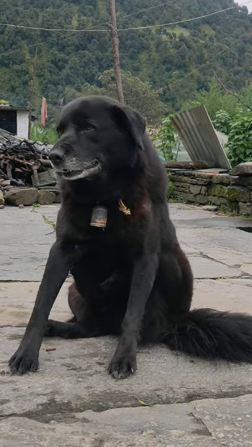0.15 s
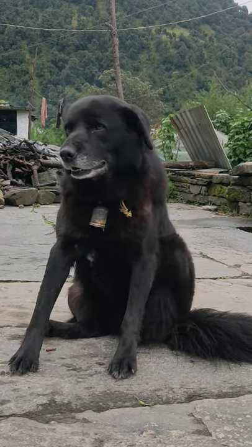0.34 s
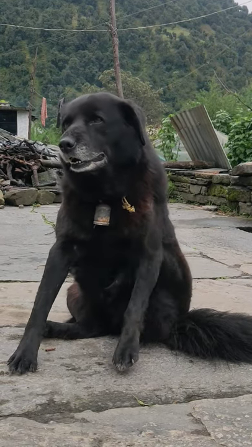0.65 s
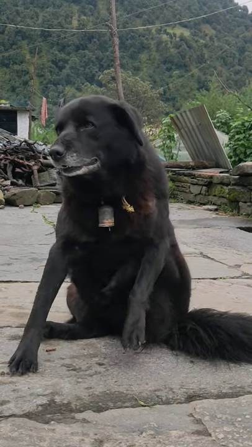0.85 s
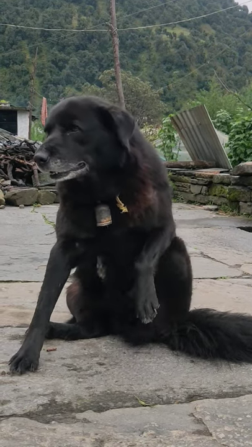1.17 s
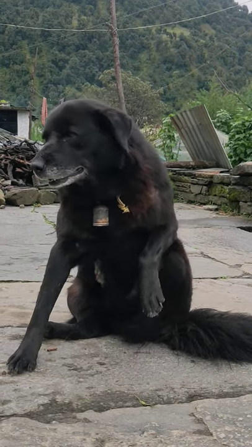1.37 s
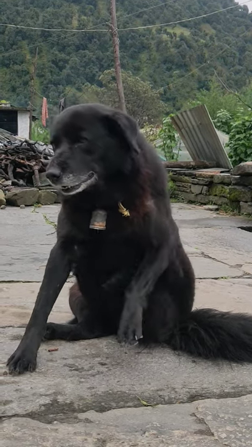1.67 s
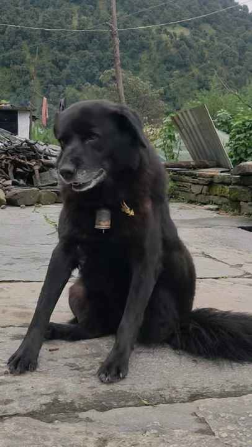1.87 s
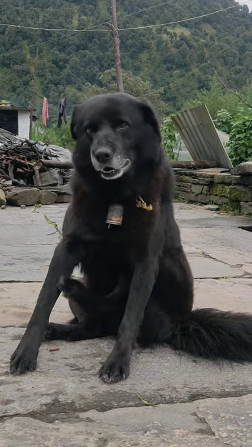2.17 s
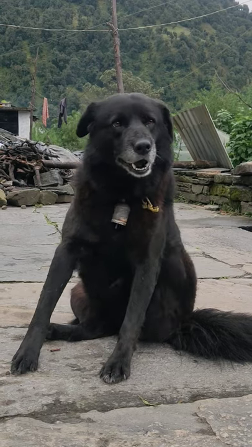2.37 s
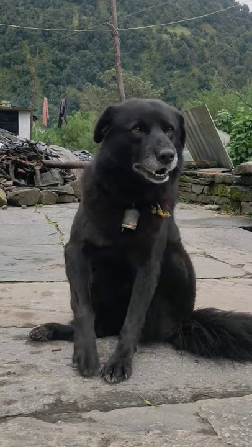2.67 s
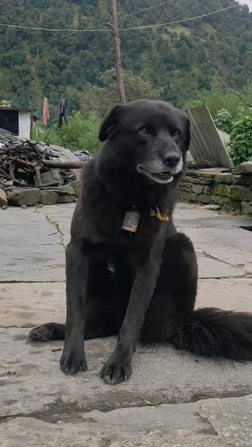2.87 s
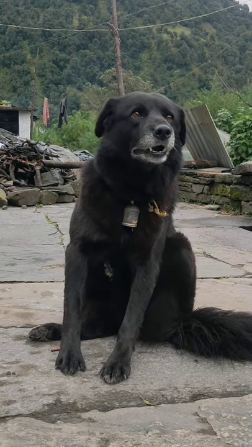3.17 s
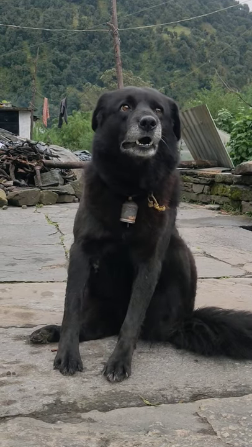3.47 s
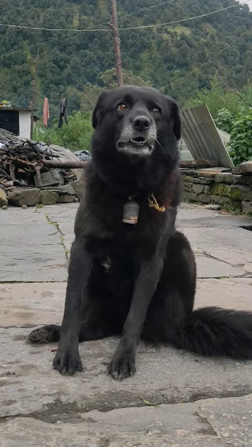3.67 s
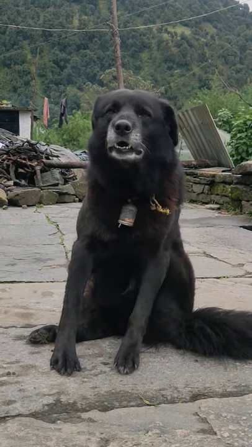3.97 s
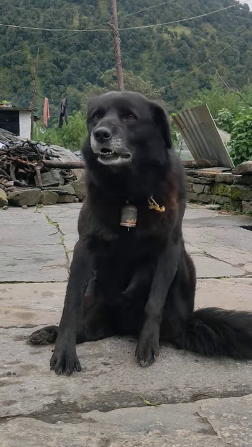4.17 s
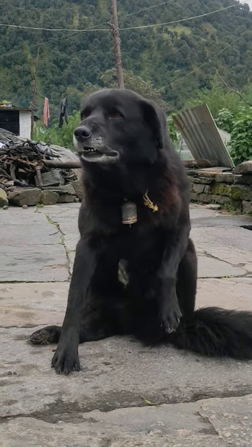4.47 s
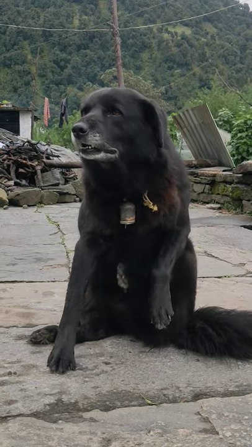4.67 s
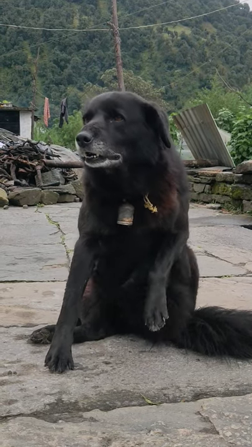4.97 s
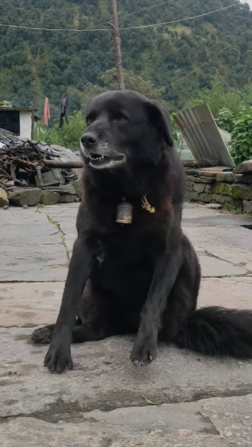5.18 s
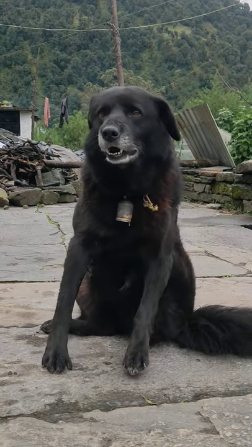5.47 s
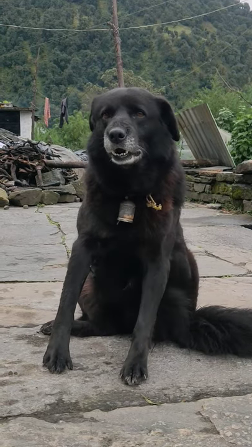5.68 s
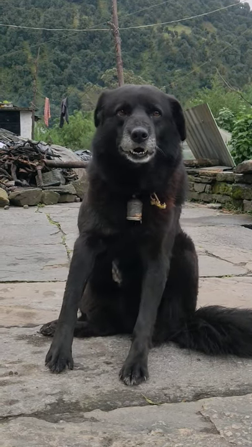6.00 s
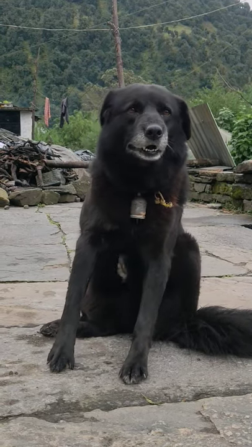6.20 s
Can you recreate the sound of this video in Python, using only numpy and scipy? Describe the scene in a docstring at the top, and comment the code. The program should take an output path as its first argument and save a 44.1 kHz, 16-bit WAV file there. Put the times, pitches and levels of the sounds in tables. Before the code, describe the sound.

A small metal bell on a dog's collar clanks and rings close to the microphone, in quick, uneven strokes with a few brief pauses, as the dog scratches and shifts. The dog pants softly throughout. Further off in the stone courtyard, a bird gives two runs of quick chirps, then another whistles and trills near the end. A quiet hush of wind and distant water lies underneath.

```python
"""A small collar bell jingles as a panting dog scratches itself in a stone courtyard.
The clapper knocks about nine times a second: each blow gives a short clank and sets the metal ringing.
The low tones come in pairs, and the spot hit on the rim decides which twin of a pair rings more.
The panting is air rushing through throat and mouth. Three birds sing gliding tones around the yard,
over a quiet hush of wind and distant water and one brief, faint hiss of insects."""
import sys
import numpy as np
from scipy import signal
from scipy.fft import rfft, irfft
from scipy.io import wavfile

SR = 44100
rng = np.random.default_rng(int(sys.argv[2]) if len(sys.argv) > 2 else 0)


def master(y):
    """Save y as 16-bit WAV."""
    cut = np.clip(np.atleast_2d(y).T, -1, 1)
    pcm = np.round(cut * 32767)  # scale
    wavfile.write(sys.argv[1], SR, pcm.astype(np.int16))


N = 279594

# Tone colour of the hush: f/Hz, relative level/dB
HUSH_COLOUR = [(70, -24), (120, -12.5), (220, -6), (450, -9.5), (800, -7), (1300, -10), (2000, -14),
               (3500, -22), (4800, -36), (7500, -47), (15700, -40), (16100, -75)]
# Loudness of the hush: t/s, level/dB
HUSH_LEVEL = [(0, -53), (3, -55.5), (6.34, -58)]
# Far bird's notes: start t/s, end t/s, start f/Hz, end f/Hz, level/dB
FAR_SLIDES = [(0.043, 0.122, 6900, 6100, -73), (.235, 0.29, 5260, 5700, -76),
              (0.283, 0.35, 5100, 4730, -75), (0.308, 0.342, 6470, 6340, -71),
              (3.354, 3.427, 5830, 7300, -71.5), (3.48, 3.556, 7200, 6040, -76),
              (3.608, 3.656, 6000, 5870, -71), (3.724, 3.793, 5740, 7230, -70),
              (3.823, 3.92, 5450, 5140, -73), (3.947, 4.01, 6940, 5760, -71), (4.21, 4.25, 6370, 6750, -74),
              (4.48, 4.57, 5660, 6440, -74)]
# Whistling bird, one list per note: t/s, f/Hz, level/dB, trill depth/0-1
WHISTLES = [
    [(4.705, 2860, -62, 0.4), (4.72, 2960, -58, 0.4), (4.735, 3130, -52, 0.6), (4.745, 3050, -70, .3)],
    [(4.755, 2800, -73, 0), (4.85, 3130, -49, 0), (4.9, 3360, -50, 0.5), (4.93, 3456, -50, 0.6),
     (4.96, 3470, -60, .9), (5.1, 3550, -51, 0.5), (5.345, 3520, -56, 0.64), (5.355, 3450, -76, .9)],
    [(5.415, 3120, -59, 0.5), (5.44, 3420, -59, 0.7), (5.47, 3040, -52, 0.4), (5.478, 3020, -76, 0.2)],
    [(5.482, 3000, -79, 0), (5.5, 3080, -56, 0), (5.525, 3125, -40.5, 0.04), (5.545, 2930, -67, 0),
     (5.562, 2830, -57, 0.1), (5.57, 2770, -68, 0)],
]
# Chirping bird's calls: t/s, level/dB
CHIRPS = [(.80, -66), (.879, -60.5), (.96, -59), (1.038, -59), (1.125, -61), (1.205, -59), (1.295, -58.5),
          (1.39, -60.5), (3.10, -61.5), (3.171, -60), (3.248, -65), (3.325, -62), (3.408, -62.5),
          (3.494, -61), (3.58, -61), (3.67, -61), (3.762, -59.5)]
# The arch of one chirp: t/s, f/Hz, added level/dB
CHIRP_SHAPE = [(0, 3483, -10), (.005, 3462, 15), (.014, 3702, 12), (0.019, 4016, 8), (.032, 3625, 12.5),
               (.038, 3200, -28)]
# Notes that open or close a run of chirps: t/s, length/s, start f/Hz, top f/Hz, end f/Hz, level/dB
SINGLE_NOTES = [(0.746, 0.029, 4370, 4600, 3390, -46.5), (3.03, 0.039, 4400, 4580, 3390, -51),
                (3.863, 0.033, 3940, 4300, 3900, -52)]

# Breaths, out and in by turns: middle t/s, throat level/dB
PANTS = [(.126, -44.5), (.338, -50), (0.511, -46.5), (.738, -50.5), (0.864, -51.5), (1.054, -49),
         (1.211, -45.5), (1.425, -53.5), (1.568, -50.5), (1.75, -50), (1.883, -47.5), (2.092, -59),
         (2.285, -49.5), (2.48, -50.5), (2.614, -44.5), (2.817, -51), (2.942, -52), (3.284, -51),
         (3.432, -49), (3.591, -49), (3.736, -48.5), (3.954, -52), (4.112, -50.5), (4.26, -58),
         (4.357, -55.5), (4.58, -57.5), (4.741, -55.5), (4.92, -61.5), (5.15, -60), (5.25, -56.5),
         (5.382, -56.5), (5.604, -56), (5.795, -55), (5.95, -57), (6.084, -50)]
# A breath out, then a breath in: length/s, mouth level against the throat/dB
BREATH_KINDS = [(.08, -9), (.105, -13.5)]
# Pitches that the open mouth boosts: f/Hz, width/Hz, relative level/dB
MOUTH_BANDS = [(525.5, 55, 1.5), (1227, 230, 8.5), (2455, 350, -5)]

# Clapper blows; the first row is a ring already under way: t/s, clank level/dB, level/dB of each of
# the three low pairs, treble level/dB, treble tilt/dB per octave, spot on the rim/degrees
BLOWS = [(0.0, -61.5, -25, -43.5, -88, -98, 0, 94), (0.0251, -29.5, -24, -37.5, -52, -55, -26, 101.7),
         (0.139, -35.5, -19.5, -41.5, -60.5, -56.5, 12, 93.0),
         (0.4969, -38, -26, -39.5, -62.6, -56.5, 5, 157), (0.575, -26, -11, -37.5, -52.5, -45, 7, 92.0),
         (0.6562, -32.5, -19, -38.5, -75, -63.1, 14, 155), (0.8131, -28.5, -17, -39, -63, -61, 18, 103),
         (0.929, -41, -24.5, -58.3, -62.5, -60.5, -5.0, 175.5),
         (1.122, -32, -23, -38.5, -69, -59, -3.0, 39.0), (1.2323, -25, -17.5, -42.5, -57, -52, 20.0, 106.2),
         (1.3372, -24.5, -21, -45.2, -40, -51.7, -13, 139),
         (1.4503, -26.5, -17.5, -39.5, -65, -53, 17, 109.2),
         (1.5492, -34, -19, -40.5, -45, -48.5, -27, 99.4), (1.6547, -26, -17.5, -40.5, -60.2, -63, -3, 95),
         (1.7825, -36.5, -23, -42.5, -56.5, -62.5, -3, 90.5),
         (2.1929, -34.5, -32.5, -43.5, -48.5, -55.5, -43, 100),
         (2.3239, -30.5, -20, -38.1, -61, -51, 0, 46), (2.4321, -28.5, -20.5, -38.5, -57, -51.5, -3, 33.6),
         (2.5806, -30.5, -25.5, -37, -61, -47, -2, 3.4), (2.6675, -29.5, -20, -37, -58, -47.5, -18, 41),
         (2.8608, -35, -25, -40, -77.2, -54, -11, 69.5), (2.9352, -26, -20, -37.5, -82, -51, 4, 56),
         (3.1082, -41, -25.5, -42, -71, -52.5, 3.0, 8.1), (3.2211, -30.5, -20.1, -45.5, -68, -52, 1, 24.6),
         (3.4404, -34, -25.5, -40, -57.5, -52, 0, 1.1), (3.545, -28.5, -21, -38.5, -60.5, -53, -3, 33.7),
         (3.6916, -32, -21, -39, -61, -52, 6, 84.4), (3.81, -35.5, -23, -38.6, -55.5, -58.5, 6.0, 73.5),
         (3.9275, -27.5, -21, -39.5, -56, -51, 9, 77), (4.0167, -29, -20, -38, -59, -53.5, 5, 27.6),
         (4.145, -29.5, -17.5, -40.5, -72, -55, -9, 162.7), (4.2586, -33, -25, -42.5, -50, -60.5, 8, 161.5),
         (4.3666, -28, -21, -37.6, -62, -51, 2, 132), (4.4785, -31.5, -27.5, -49, -53, -54.5, -13, 140),
         (4.5752, -28, -21, -40, -71, -52, 2.0, 155.4), (4.6842, -32.5, -22.5, -38, -47.5, -57, -7, 144),
         (4.7847, -22.5, -20, -40, -65, -46, 20, 117), (4.8896, -27.5, -23, -44, -49.5, -50, -13, 117.0),
         (4.9829, -28.5, -19, -39.5, -54, -53.6, 14, 97.4),
         (5.11, -33.5, -29.5, -41.5, -52.4, -60.5, -19, 151.4),
         (5.209, -31.5, -23, -41.5, -61.3, -54, -1, 92.0), (5.3254, -34.5, -32, -48.6, -62.5, -65, -23, 93),
         (5.6578, -41, -32, -47.5, -78.5, -63, 0, 142), (5.817, -45, -32, -47, -84, -65, -8, 39.0),
         (5.9429, -28, -22.5, -40.5, -57, -54, 9, 32.6), (6.091, -36, -23, -38.5, -66.6, -54.5, -4, 73.6),
         (6.167, -27, -20.5, -36, -62.0, -54, -2.0, 138), (6.3123, -32.5, -24, -40, -55.5, -48.5, 16, 77.6)]
# Faint ticks of collar and claws: t/s, level/dB
TICKS = [(.079, -48), (.322, -50), (1.001, -43), (1.028, -51), (1.504, -41), (2.541, -50), (2.996, -46),
         (4.748, -43)]
# Short-lived tones of a clank: f/Hz, relative level/dB, fade time/s (the time to drop by 60 dB)
CLANK_TONES = [(1240, -6, 0.013), (2370, -5.5, 0.012), (2923, -16.5, 0.032), (5780, -20, 0.024)]
# The bell's six low tones, pair by pair: f/Hz
LOW_HZ = [1416, 1522, 3876, 4409, 7380, 7585]
# The same tones: relative level when hit on their best spot/dB, basic fade time/s
LOW_TONES = [(-16, 0.64), (1.5, 0.34), (1.5, 0.54), (-2.5, .45), (-2, 0.24), (1.5, 0.27)]
# How each pair bends the rim: number of waves around it
RIM_WAVES = [2, 3, 4]
# Where each pair's wave pattern starts: angle/degrees
RIM_START_DEG = [0, 63.5, 151]
# The bell's treble tones: f/Hz
TREBLE_HZ = [9233, 9736, 9927, 10466, 11185, 11547, 12326, 12565, 12803, 12986, 13783, 14050, 14595, 14845,
             15320]
# Their usual shares of the treble: relative level/dB
TREBLE_SHARES = [-12.5, -10.5, -22, -5, -1.5, -6, -17.5, -3.5, -7, 0.5, -13, -9.5, -3.5, -19, -16]
# How hard the fur muffles the bell as the dog shifts: t/s, fade speed/factor (1 = usual)
FUR_DAMPING = [(0, 1.03), (.8, 0.89), (1.2, 0.85), (1.7, 0.94), (2.3, 1.15), (3, 1.08), (4, 1.09),
               (4.6, 0.73), (5.2, 0.99), (6.34, 0.91)]

STEP = 64   # samples between the points of a slow curve


def amp(db):
    """Turn decibels into a factor to multiply by."""
    return 10 ** (np.asarray(db) / 20)


def rms_one(x):
    """Scale to an average strength (rms) of 1."""
    return x / np.sqrt(np.mean(x ** 2) + 1e-20)


def filtered(x, order, hz, kind="low"):
    """Keep the lows, the highs or a band; a higher order cuts more steeply."""
    return signal.sosfilt(signal.butter(order, hz, kind, fs=SR, output="sos"), x)


def drift(hz):
    """A random wander of typical size 1; more hz makes it quicker."""
    return rms_one(filtered(rng.standard_normal(N + SR), 2, hz)[SR:])


def resonate(x, hz, width):
    """A resonance: keep what lies near one pitch and weaken the rest."""
    r = np.exp(-np.pi * width / SR)
    gain = (1 - r * r) / 2
    return signal.lfilter([gain, 0, -gain], [1, -2 * r * np.cos(2 * np.pi * hz / SR), r * r], x)


def add(out, s, sound):
    """Mix a short sound in at s seconds."""
    at = round(s * SR)
    out[at:at + len(sound)] += sound[:max(N - at, 0)]


def hush():
    """Wind in the trees and distant water: smooth noise whose loudness wavers."""
    hz = np.maximum(np.fft.rfftfreq(N, 1 / SR), 1)
    colour_hz, colour_db = np.transpose(HUSH_COLOUR)
    colour = amp(np.interp(np.log(hz), np.log(colour_hz), colour_db))
    noise = rms_one(irfft(rfft(rng.standard_normal(N)) * colour, N))
    level_db = np.interp(np.arange(N) / SR, *np.transpose(HUSH_LEVEL))
    return noise * amp(level_db + 2.1 * drift(hz=9.6))


def insects(hz=6450, width_hz=400, level_db=-83, peak_s=1.95, swell_s=.35):
    """A thin hiss and a weaker one an octave higher swell once and fade."""
    hiss = np.zeros(N)
    for multiple in (1, 2):
        band = resonate(rng.standard_normal(N), multiple * hz, width_hz)
        hiss += rms_one(resonate(band, multiple * hz, width_hz)) / multiple
    swell = np.exp(-((np.arange(N) / SR - peak_s) / swell_s) ** 2)
    return amp(level_db) * hiss * swell


def yard_echo(x, fade_s=.24, gap_s=.008):
    """Stone walls and trees scatter a sound into many fading echoes after a short gap."""
    t = np.arange(SR // 2) / SR
    echoes = rng.standard_normal(len(t)) * amp(-60 * t / fade_s) * (t > gap_s)
    return signal.fftconvolve(x, echoes / np.sqrt(np.sum(echoes ** 2)))[:N]


def sing(rows, trill=0., warble_swing_hz=0., trill_per_s=99, trill_swing_hz=260, warble_per_s=194):
    """A tone gliding along t/s, f/Hz, level/dB; a trill shakes level and pitch, a warble only pitch."""
    s, hz, db = np.transpose(rows)[:3]
    t = np.arange(s[0], s[-1], 1 / SR)
    depth = np.interp(t, s, trill * np.ones(len(s)))
    shake = depth * np.sin(2 * np.pi * trill_per_s * t)
    warble = warble_swing_hz * np.sin(2 * np.pi * warble_per_s * (t - s[0]))
    pitch = np.interp(t, s, hz) + warble + trill_swing_hz * shake
    return amp(np.interp(t, s, db)) * (1 + shake) * np.sin(2 * np.pi * np.cumsum(pitch) / SR)


def far_bird(blur_hz=148):
    """Faint high slides, blurred by moving air and leaves on the way."""
    out = np.zeros(N)
    for start, end, from_hz, to_hz, db in FAR_SLIDES:
        note = sing([(start, from_hz, db), (end, to_hz, db)])
        add(out, start, note * np.hanning(len(note)) ** .5)
    return out * drift(blur_hz)


def whistling_bird():
    """A nearby bird's whistle breaks into a trill."""
    out = np.zeros(N)
    for note in WHISTLES:
        add(out, note[0][0], sing(note, trill=np.array(note)[:, 3]))
    return out


def chirping_bird(warble_swing_hz=133, rising_share=.246):
    """A nearby bird's warbled chirps and single notes, each rising and falling in pitch."""
    out = np.zeros(N)
    for (s, db), tuning in zip(CHIRPS, rng.normal(1, 0.017, len(CHIRPS))):
        arch = np.array(CHIRP_SHAPE) * [1, tuning, 1]
        add(out, s, amp(db) * sing(arch, warble_swing_hz=warble_swing_hz))
    for s, length, from_hz, top_hz, to_hz, db in SINGLE_NOTES:
        arch = [(s, from_hz, db), (s + rising_share * length, top_hz, db), (s + length, to_hz, db)]
        note = sing(arch, warble_swing_hz=warble_swing_hz)
        add(out, s, note * np.hanning(len(note)))
    return out


def panting(throat_hz=771.7, throat_width_hz=43.5):
    """Puffs of air whistle in the throat and rush through the open mouth, more so when breathing out."""
    middle, throat_db = np.transpose(PANTS)[:, :, None]
    length, open_db = np.resize(BREATH_KINDS, (len(PANTS), 2)).T[:, :, None]
    t = np.arange(0, N, STEP) / SR
    puffs = np.exp(-(2 * (t - middle) / length) ** 2)
    throat_gain = np.repeat((amp(throat_db) * puffs).sum(axis=0), STEP)[:N]
    mouth_gain = np.repeat((amp(throat_db + open_db) * puffs).sum(axis=0), STEP)[:N]
    throat = rms_one(resonate(rng.standard_normal(N), throat_hz, throat_width_hz))
    air = rng.standard_normal(N)
    mouth = sum(amp(db) * rms_one(resonate(air, hz, width)) for hz, width, db in MOUTH_BANDS)
    return filtered(throat_gain * throat + mouth_gain * mouth, order=4, hz=3500)


def clapper_bounces(gap_s=.0038, scatter_s=.026, drop_db=17):
    """The clapper skitters after a blow, making two softer knocks: t/s, level/dB."""
    draws = rng.random((len(BLOWS), 2, 2))
    return [(s + gap_s + scatter_s * late, db - drop_db * (1 + soft))
            for (s, db, *_), pair in zip(BLOWS[1:], draws) for late, soft in pair]


def clanks(crack_db=-2.5, crack_fade_s=.011, sizzle_db=-15.5, sizzle_fade_s=.035):
    """Each knock or tick is a crack of noise, a sizzle of crowded high tones and a few short tones."""
    hz, db, fade_s = np.transpose(CLANK_TONES)[:, :, None]
    t = np.arange(SR // 12) / SR
    knocks = [row[:2] for row in BLOWS[1:]] + TICKS + clapper_bounces()
    noises = rng.standard_normal((len(knocks), len(t)))
    uneven_db = 4 * rng.standard_normal((len(knocks), len(hz), 1))
    out = np.zeros(N)
    for (s, level_db), noise, extra_db in zip(knocks, noises, uneven_db):
        crack = amp(crack_db - 60 * t / crack_fade_s) * filtered(noise, 1, 3250)
        sizzle = amp(sizzle_db - 60 * t / sizzle_fade_s) * filtered(noise, 3, (8030, 16500), "band")
        tones = amp(db + extra_db - 60 * t / fade_s) * np.sin(2 * np.pi * hz * t)
        add(out, s, amp(level_db) * (crack + sizzle + tones.sum(axis=0)))
    return filtered(out, 2, 900, "high")   # a small bell gives off no bass


def bell_swing(hz, speed_hz=9, lowest_tone_db=1.2):
    """The bell swings and twists, so each tone's beam of sound sweeps past; high tones waver more."""
    smooth = signal.butter(2, speed_hz, fs=SR / STEP, output="sos")
    sway = signal.sosfilt(smooth, rng.standard_normal((len(hz), N // STEP + 400)))[:, 300:]
    return amp(lowest_tone_db * np.sqrt(hz / hz[0]) * sway / sway.std())


def strike_levels(blow, leak=.014, pivot_hz=12000, scatter_db=7.5):
    """How hard a blow rings each tone; twins share it as cosine and sine set by the spot on the rim."""
    _, _, *pair_db, treble_db, tilt_db, spot_deg = blow
    angle = np.radians(np.multiply(RIM_WAVES, spot_deg) + RIM_START_DEG)
    twins = np.abs(np.c_[np.cos(angle), np.sin(angle)]).ravel() + leak   # no twin is ever quite silent
    low = twins * amp(np.array(LOW_TONES)[:, 0] + np.repeat(pair_db, 2))
    octaves = np.log2(np.array(TREBLE_HZ) / pivot_hz)
    share_db = TREBLE_SHARES + tilt_db * octaves + scatter_db * rng.standard_normal(len(TREBLE_HZ))
    return np.r_[low, amp(treble_db) * rms_one(amp(share_db))][:, None]


def bell_ring(rise_cycles=1.8, treble_fade_cycles=1620, tail_share=.17, tail_stretch=1.9):
    """The metal rings in many fading tones; each blow replaces the old ring within a few vibrations."""
    hz = np.r_[LOW_HZ, TREBLE_HZ][:, None]
    fade_s = np.r_[np.array(LOW_TONES)[:, 1], treble_fade_cycles / np.array(TREBLE_HZ)][:, None]
    tail = tail_share * (hz <= max(LOW_HZ))   # the fur reaches part of each low tone less, so it lingers
    rise_s = rise_cycles / hz
    beams = bell_swing(hz)
    phases = rng.uniform(0, 2 * np.pi, (len(BLOWS), len(hz), 1))
    starts = [blow[0] for blow in BLOWS]
    out = np.zeros(N)
    for blow, start, end, phase in zip(BLOWS, starts, starts[1:] + [N / SR], phases):
        t = np.arange(round((end - start + .01) * SR)) / SR
        fade_in = 1 - np.exp(-t / rise_s)
        cut_off = np.exp(-np.maximum(start + t - end, 0) / rise_s)
        beam = np.array([np.interp((start + t) * SR / STEP, np.arange(len(b)), b) for b in beams])
        beam /= beam[:, :1]   # the swing only changes the level after the blow
        loss_db = -60 * np.interp(start, *np.transpose(FUR_DAMPING)) * t / fade_s
        decay = (1 - tail) * amp(loss_db) + tail * amp(loss_db / tail_stretch)
        tones = strike_levels(blow) * np.sin(2 * np.pi * hz * t + phase)
        add(out, start, (tones * fade_in * cut_off * beam * decay).sum(axis=0))
    return out


def scene():
    """The bell and dog are close; the birds are further off, so they have more echo."""
    bell = bell_ring() + clanks()
    near_birds = chirping_bird() + whistling_bird()
    far = far_bird()
    echo = yard_echo(amp(-20) * bell + amp(-7) * near_birds + amp(6) * far)
    return (bell + near_birds + far + echo + panting() + hush() + insects())[None]


def record(dry, low_cut_hz=58, top_cut_hz=16900):
    """The microphone drops the deep bass; the highest treble is cut steeply."""
    thin = filtered(dry, 4, low_cut_hz, "high")
    return signal.sosfilt(signal.cheby2(12, 70, top_cut_hz, fs=SR, output="sos"), thin)


dry = scene()
out = record(dry)
master(out)
```